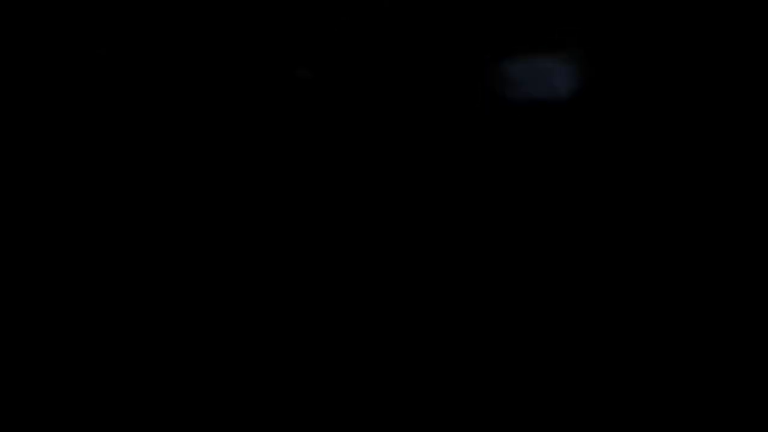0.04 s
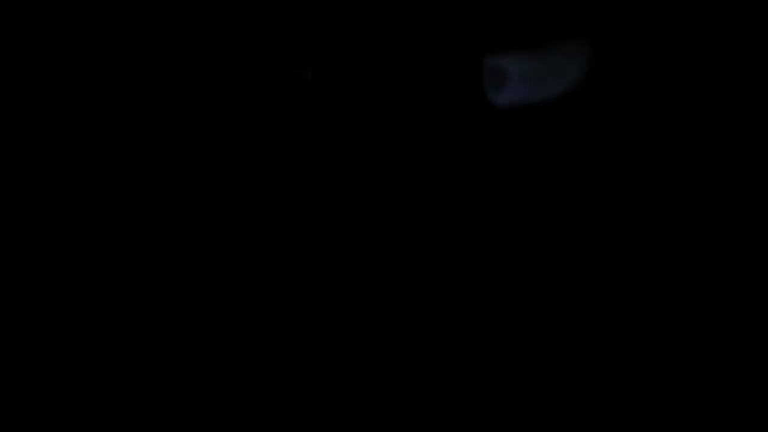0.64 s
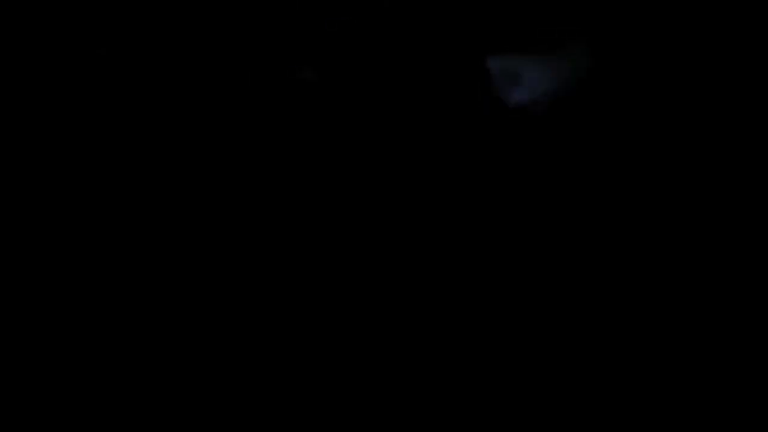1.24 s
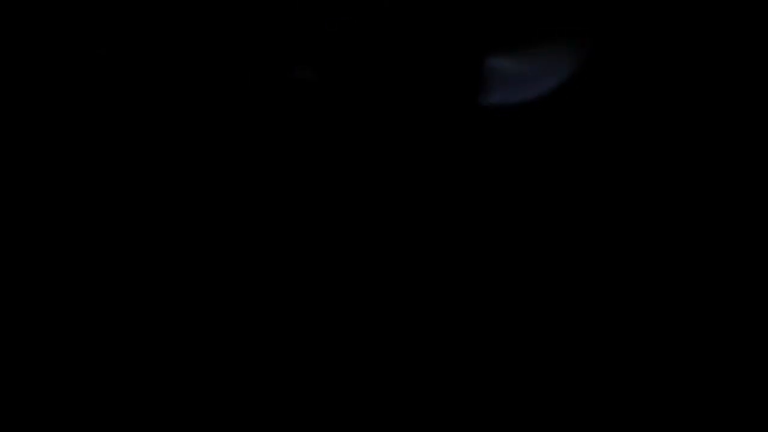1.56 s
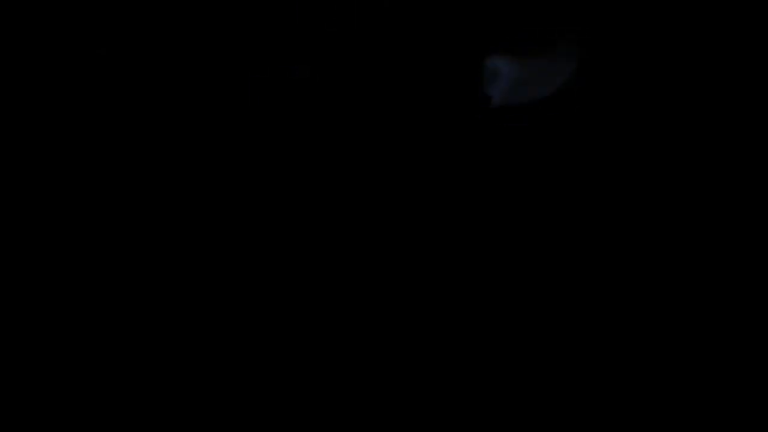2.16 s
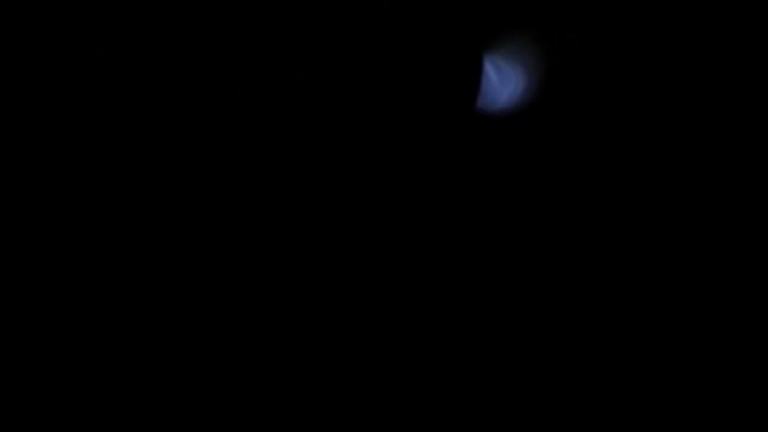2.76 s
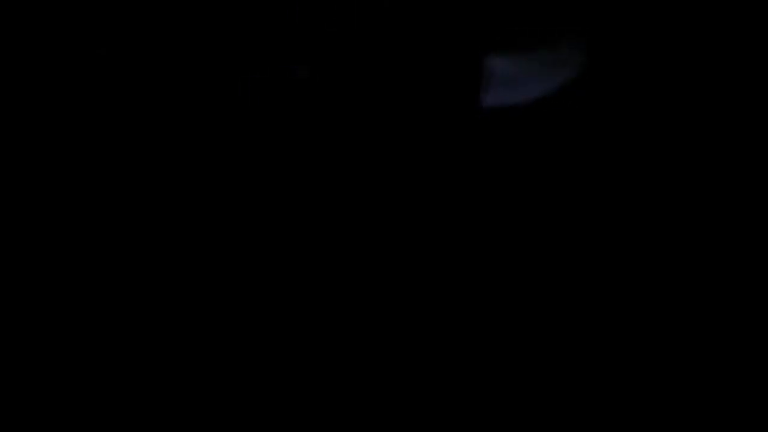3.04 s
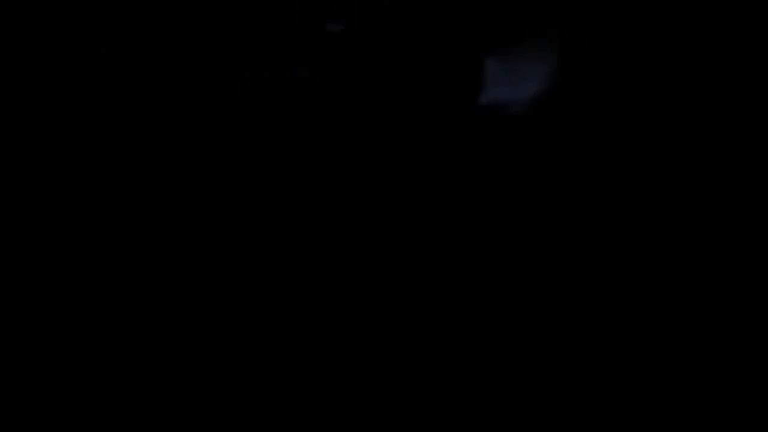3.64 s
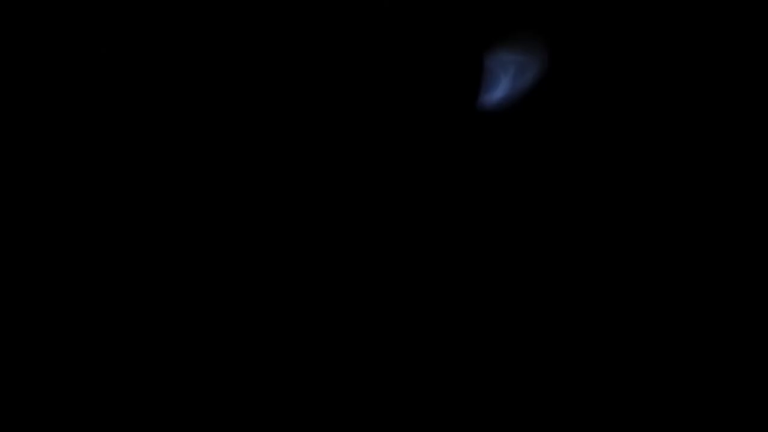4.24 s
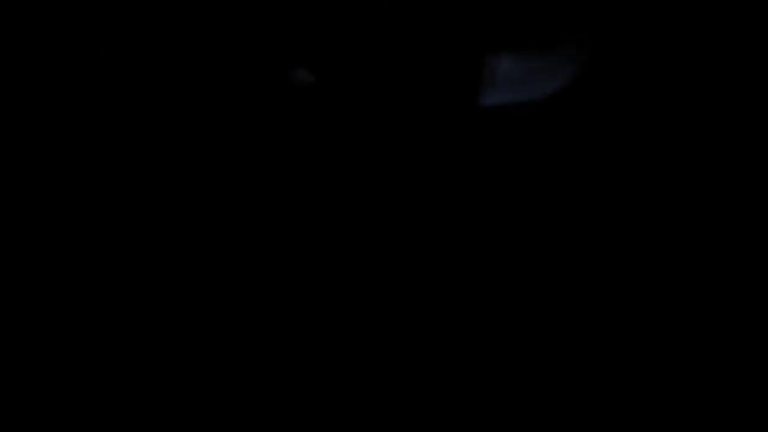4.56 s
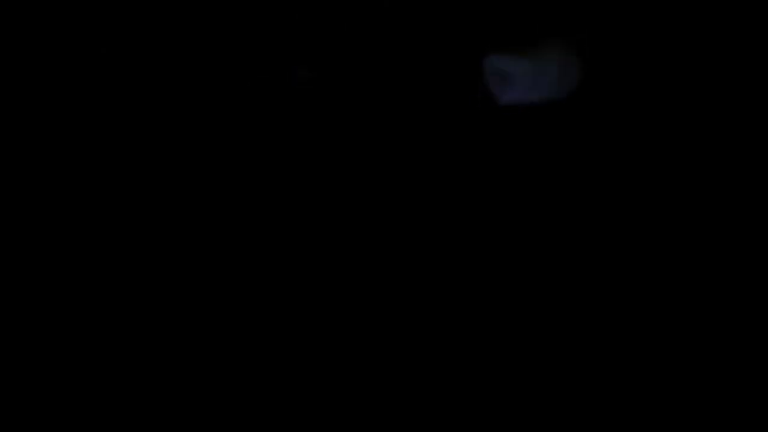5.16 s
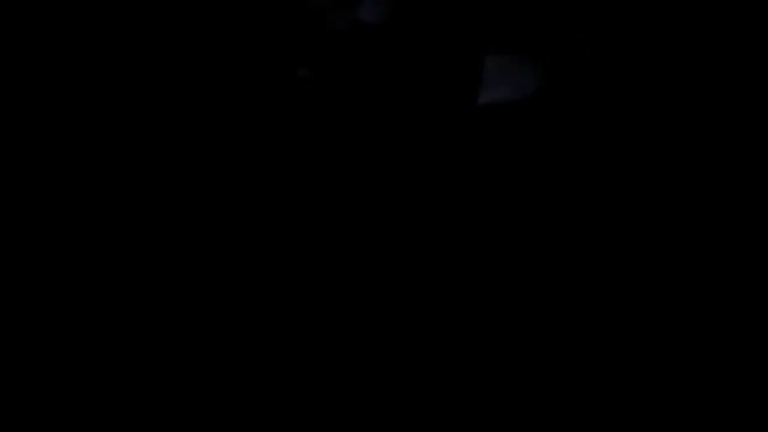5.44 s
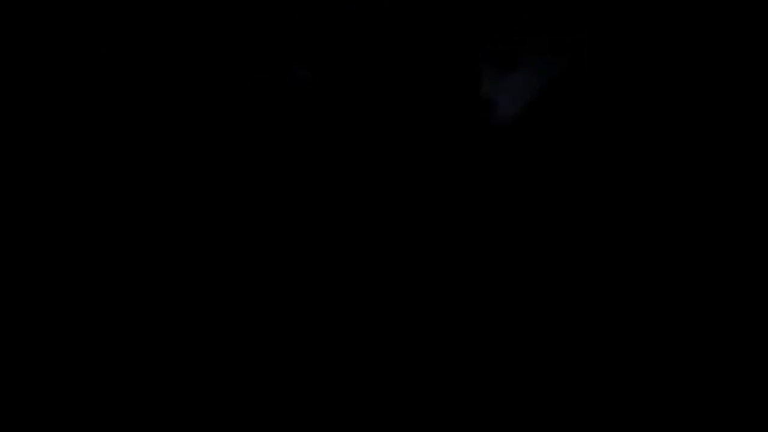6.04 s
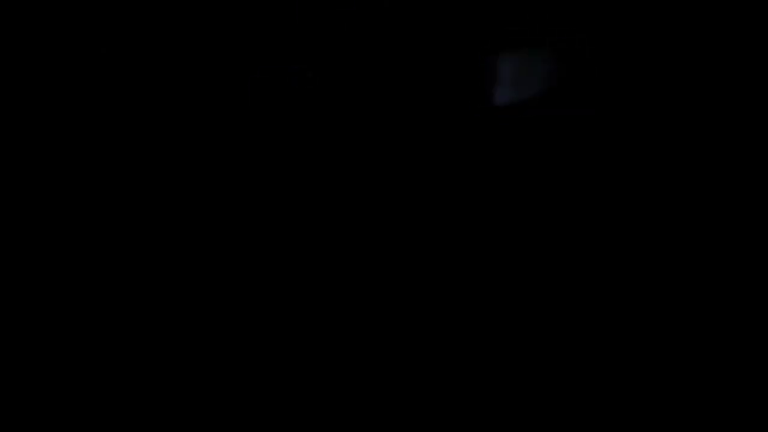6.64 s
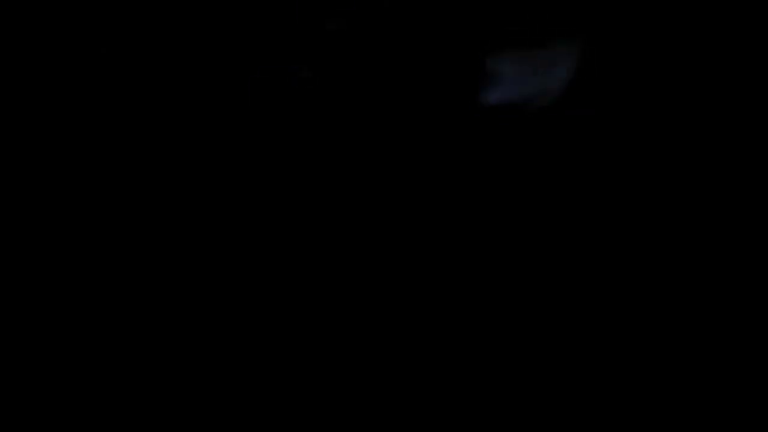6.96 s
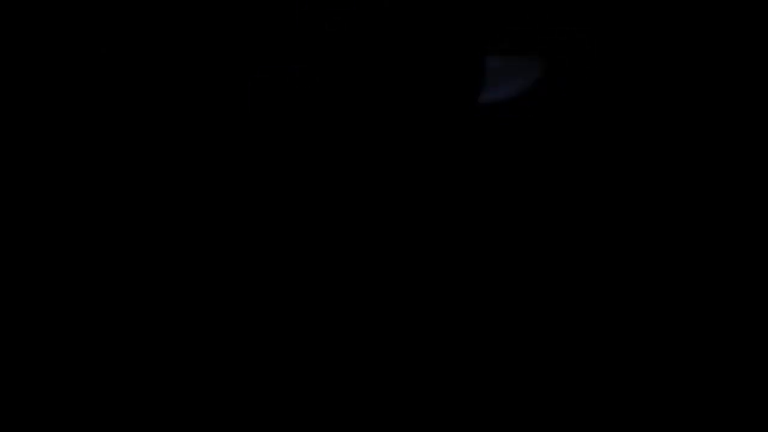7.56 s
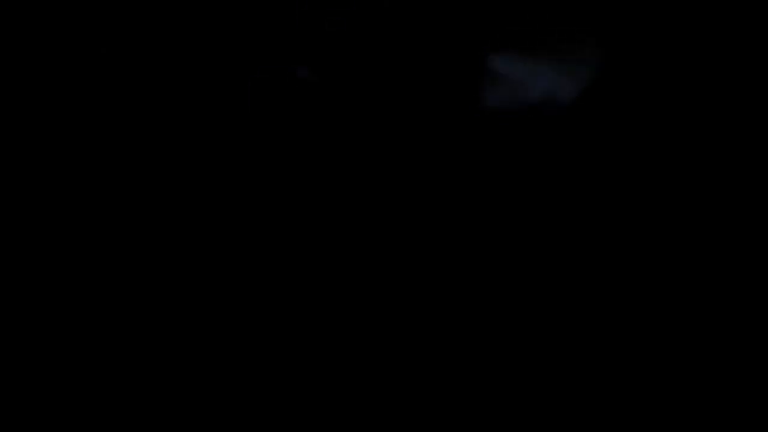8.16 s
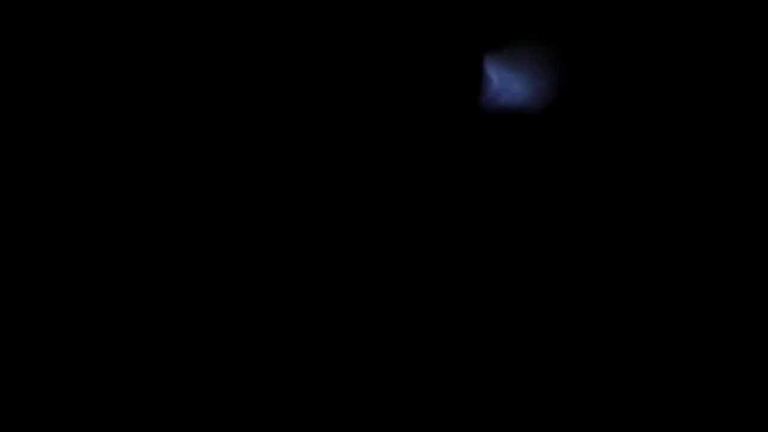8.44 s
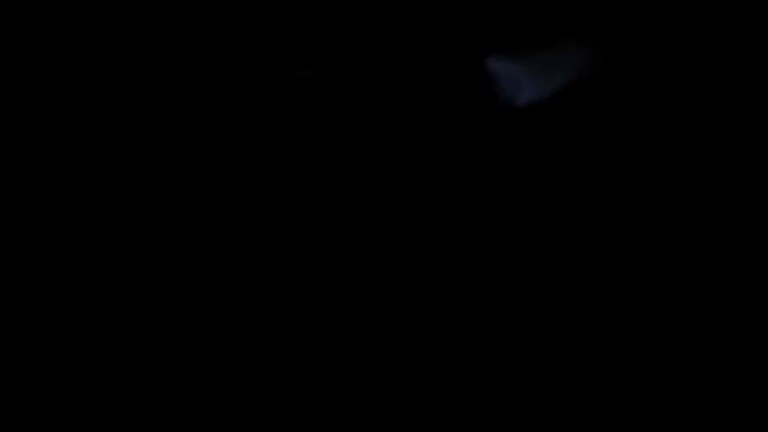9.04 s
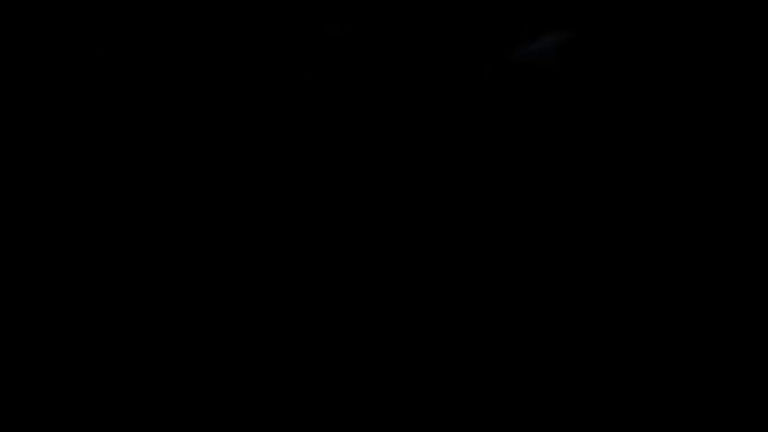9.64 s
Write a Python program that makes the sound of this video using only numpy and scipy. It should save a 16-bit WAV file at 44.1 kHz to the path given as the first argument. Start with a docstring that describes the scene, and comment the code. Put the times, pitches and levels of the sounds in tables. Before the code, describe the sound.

A blowlamp flame burns close by with a fast, rough flutter of soft puffs, topped by crackle and the hiss of the burner tube. At irregular moments the flame lifts off for an instant, leaving a thin jet hiss, then strikes back with a sharp pop and a brief rattle. The tube gives one hollow knock past the middle, and the flame blows off with a faint whoof at the end.

```python
"""A blowlamp flame burns close by, fluttering some forty times a second. Each swing burns a pocket of
gas with a soft puff; crackle rides on top and the burner tube hisses in between. Now and then the flame
lifts off, leaving the thin hiss of the bare jet over a low murmur, then strikes back with a sharp pop
and a brief rattle. The tube gives one hollow knock, and at the very end the flame blows off with a
faint whoof."""
import sys
import numpy as np
from scipy import signal
from scipy.fft import rfft, irfft, next_fast_len
from scipy.io import wavfile
from scipy.ndimage import uniform_filter1d, map_coordinates

SR = 44100
rng = np.random.default_rng(int(sys.argv[2]) if len(sys.argv) > 2 else 0)


def master_out(mix):
    """Clip the mix to full scale and print it as 16-bit PCM to the path in sys.argv[1]."""
    frames = np.transpose(np.atleast_2d(mix))
    ceiling = np.clip(frames, -1, 1)
    pcm = np.round(ceiling * 32767).astype(np.int16)
    wavfile.write(sys.argv[1], SR, pcm)


N = 437031
T = np.arange(N) / SR

FLUTTER_HZ = 43.58
LAST_SWING_S, LIFTED_S = .107, .095  # ahead of each pop: a last swing, then the lift-off
KNOCK_S, KNOCK_DB = 6.6425, -28
BLOW_OFF_S = 9.736
WHOOF_S, WHOOF_HZ, WHOOF_DB = 9.856, 263, -46.5

# Cue levels are pre-EQ.
# Accented puffs, some just ahead of a pop: time_s, level_db, width_ms
ACCENT_PUFFS = [(0.125, -22, 0.85), (0.164, -23, 1.2), (0.215, -21, 1.34), (0.388, -21, 1.04),
                (0.435, -21, 1.05), (0.556, -20.5, 1.17), (0.606, -19.5, 0.97), (0.841, -20.5, 1.14),
                (0.887, -23, 0.92), (0.963, -21, 0.89), (1.015, -22.5, 2.1), (1.1154, -21, 0.68),
                (1.121, -20, 0.86), (1.228, -33, 0.46), (1.3791, -23.5, 1.3), (1.525, -25.5, 1.1),
                (1.609, -22, 1.07), (1.894, -23.5, 2.3), (1.9237, -22, 0.66), (2.005, -21, 1.4),
                (2.1419, -21.5, 0.73), (2.348, -22, 1.3), (2.605, -23.5, 0.84), (2.668, -23, 1.65),
                (2.89, -28, 0.84), (3.236, -22, 0.86), (3.484, -20, 0.9), (3.584, -18.5, 1.13),
                (3.638, -24.5, 0.68), (3.727, -28, 1.52), (3.911, -29.5, 0.8), (4.069, -20.5, 1.75),
                (4.383, -23, 2.3), (4.616, -21, 1.1), (5.278, -22.5, 0.83), (5.326, -26.5, 0.81),
                (5.5145, -18, 0.77), (5.629, -21.5, 1.6), (6.017, -18, 1.5), (6.152, -20.5, 1.5),
                (6.202, -21, 1.01), (6.266, -18, 1.16), (6.353, -21.5, 1), (6.407, -19.5, 1.12),
                (6.427, -22, 0.93), (6.5045, -24, 1.16), (6.566, -23, 1.4), (6.6873, -26.5, 1.33),
                (6.752, -23, 1.06), (6.881, -20.5, 2), (6.913, -24, 2.3), (7.001, -20, 1.99),
                (7.093, -22, 1.29), (7.15, -22.5, 1.1), (7.246, -22, 1.5), (7.287, -24, 0.68),
                (7.329, -22, 1), (7.4596, -18.5, 1.39), (7.509, -19, 1), (7.631, -28, 1.4),
                (7.782, -29, 0.69), (7.871, -23, 1.2), (7.892, -19.5, 1.4), (8.064, -22.5, 1),
                (8.083, -24.5, 1.7), (8.5845, -37, 1.03), (8.968, -22, 1.04), (9.4407, -19, 1.1),
                (9.6629, -25, 0.7), (9.7127, -22.5, 0.92), (9.7339, -31, 0.68)]
# Slow level ride on the ordinary puffs: time_s, gain_db
FLUTTER_RIDE = [(0, -0.5), (1.4, -1.5), (3.1, 0.5), (5, -3), (6.3, -0.5), (7.4, -5), (8.4, -1.5), (9.5, -6)]
# The flame catches twice: start_s, level_db, gap_ms
DOUBLE_CATCHES = [(1.3131, -26, 2.7), (1.4763, -26, 2.7), (3.0246, -26.5, 2.5), (4.0116, -24.5, 1.56),
                  (4.5218, -25, 2.8), (4.9379, -23.5, 2.55), (5.8885, -26, 2.44), (7.0423, -27.5, 3.5),
                  (7.1381, -27.5, 2.81), (8.0407, -24.5, 3.8), (8.7916, -25, 2.4), (9.1679, -25, 2.17)]
# The returning flame puffs softly, then harder: before_pop_s, level_db, width_ms
LEAD_IN_PUFFS = [(0.05, -39, 4.2), (.013, -32, 2.4)]
# The flame strikes back: time_s, thump_db, thump_width_ms, ring_hz, ring_db, smack_hz, smack_db,
# crack_db, crack_delay_ms, ping_db, rattle_db, rattle_delay_ms
STRIKE_BACKS = [(1.1249, -14.5, 2.44, 520, -29.5, 2100, -31, -32.5, -1, -31, -27, 4.6),
                (1.9273, -9.5, 2.24, 636, -21, 950, -24, -30.5, -1, -26, -16.5, 13),
                (2.146, -14.5, 3.6, 480, -16, 1130, -20, -29, -1.5, -46, -18, 9.7),
                (2.352, -7, 1.76, 425, -32, 1002, -31, -31, -0.1, -46, -17, 16.6),
                (2.8966, -7, 1.9, 820, -40, 1570, -25, -31.5, 0.5, -22, -21, 16.7),
                (3.487, -10.5, 1.9, 546, -17, 1090, -26, -32, -1.9, -42, -13, 13),
                (4.3949, -12.5, 0.73, 460, -20, 2490, -37, -30.5, -1.5, -42, -17, 10.3),
                (5.5235, -19.5, 1.4, 740, -24, 1100, -33, -35, 1, -38, -24, 10.5),
                (5.787, -15.5, 1.42, 546, -22.5, 2400, -39, -29.5, -1.5, -36, -15, 10.5),
                (6.0211, -11.5, 3.04, 820, -20.5, 1130, -21, -28, -1, -30, -25, 12),
                (6.6933, -9.5, 1.94, 636, -31, 1060, -31.5, -29.5, -1, -30, -23, 10.6),
                (7.642, -11, 1.87, 691.7, -27, 1350, -27.5, -31.5, -1, -28, -32, 11.4),
                (8.59, -10, 1.62, 720, -37, 1190, -25, -29.5, -2.5, -31, -28, 10.6),
                (9.6745, -14.5, 1.8, 596, -21, 1550, -27.5, -33, 1, -42, -20, 13.7)]
# Sharp spits of the flame: start_s, level_db
FLAME_SPITS = [(0.0506, -23), (0.2842, -22), (0.6281, -21), (0.3053, -19.5), (0.902, -19.5), (1.4281, -20),
               (2.5099, -21), (2.7537, -22), (3.255, -24), (3.2968, -23), (3.315, -21.5), (3.5367, -21),
               (3.7346, -22.5), (3.95, -23.5), (4.136, -21.5), (4.1612, -21), (6.0667, -22), (6.331, -21),
               (6.523, -23), (7.0449, -19), (7.912, -18.5), (8.3, -22.5), (8.437, -23), (9.0159, -22.5),
               (9.0529, -23.5), (9.2778, -26), (9.5333, -19)]
# Modes of the tube's hollow knock: pitch_hz, level_db, t60_s
HOLLOW_MODES = [(357.5, 5, 0.041), (515, 0, 0.083), (753, 3, 0.054), (1120, -15, 0.041)]
# Resonances of the burner tube: centre_hz, width_hz, gain_db
TUBE_RESONANCES = [(980, 46, -5.5), (1214, 380, 3.5), (1395, 138, -9), (1555, 337, 5), (3160, 91, -8),
                   (3845, 550, 19.5), (5970, 200, -12.5), (6210, 130, 8.5), (7345, 710, 11),
                   (8200, 350, -2), (9150, 420, 4.5)]
# Reflections off the tube's mouth and the surroundings: delay_ms, gain (negative flips polarity)
REFLECTIONS = [(2.35, 0.097), (4.7, -0.091), (8.4, 0.063)]
# The body the lamp lends each puff and thump: frequency_hz, gain_db
BODY_EQ = [(15, -98), (30, -3), (46, 0.5), (64, 0.5), (90, 4.5), (200, 5), (340, 5.5), (415, 2.5),
           (500, 6.5), (700, 7), (1000, 0), (1400, -2), (3000, -8), (6000, 1)]
# Tone of the ignition crack: frequency_hz, gain_db
CRACK_EQ = [(200, -13), (900, 4.5), (1600, -4.5), (2300, -2.5), (3100, -11), (4000, -16.5), (5000, -22.5),
            (5900, -20), (7000, -20), (7900, -19.5), (9000, -49), (15000, -37)]
# Tone of the snaps in crackle and rattle: frequency_hz, gain_db
SNAP_EQ = [(200, 5.5), (900, 7.5), (1600, 2), (2300, 2.5), (3100, -7.5), (4400, -2.5), (5200, -4),
           (6000, -8), (7500, -19.5), (9000, -38), (11000, -27), (15000, -29)]
# Broad hiss of the burning flame: frequency_hz, gain_db
HISS_EQ = [(300, -1), (1000, 2), (1400, -5), (2000, -4.5), (3100, -4.5), (3500, -9.5), (4400, 1),
           (5200, -0.5), (5900, -6), (6700, -10.5), (8200, -7.5), (10800, -7.5), (12500, -16), (15000, -50)]
# The flame's fine top-end hiss: frequency_hz, gain_db
FINE_HISS_EQ = [(1000, -14), (8000, -3), (11000, -25), (12500, -15), (15000, -16)]
# Tone of the gas jet when cold: frequency_hz, gain_db
COLD_JET_EQ = [(1000, -30), (3000, -18), (3850, 5.5), (4300, 8), (4900, 4.5), (5700, -14), (6600, -8),
               (7300, 1.5), (8000, 1.5), (8800, 8.5), (9400, -1), (10300, -14), (12000, -12), (15000, -35)]
# Low bed of burning: frequency_hz, gain_db
MURMUR_EQ = [(18, -34), (30, -20), (45, -5), (110, 2.5), (300, -5.5), (700, -11.5), (1300, -26),
             (3000, -26.5), (7000, -48.5), (15000, -57)]


def roar(ordinary, strong, strong_db=-0.5, twin_db=-31, twin_ms=3.106, twin_width=0.64, pace_spread=0.72):
    """One puff a swing, each collapsing at its own pace; ordinary pockets often split off a weaker twin."""
    out = np.zeros(N)
    chance = rng.standard_normal((600, 4))
    paces = np.exp(pace_spread * np.abs(np.tanh(chance[:, 3])))
    for (s, db, width), pace in zip(strong, paces[::-1]):
        add(out, s, lambda t: undb(db + strong_db) * puff(t, width, pace))
    for (s, db, width), (split, side, lag, _), pace in zip(ordinary, chance, paces):
        twin_gain = undb(twin_db) * (1 + np.tanh(split))
        apart_ms = np.sign(side) * twin_ms * np.exp(0.452 * lag)
        add(out, s, lambda t: undb(db) * puff(t, width, pace))
        add(out, s, lambda t: twin_gain * puff(t - apart_ms, twin_width * width))
    return out


def puff(t, width, pace=1, sharpness=1.367, suck=0.125, suck_ms=2.1, suck_width_ms=5.1):
    """A gas pocket flares to a pointed peak, then sucks back: deeper and shorter at a higher pace."""
    flare = np.exp2(-np.abs(2 * t / width) ** sharpness)
    suction = suck * pace * width * bell(t - suck_ms, suck_width_ms / pace)
    return flare - suction


def flutter(jitter=.19):
    """The flame's rhythm: swing times that land on the cues, and which swings are ordinary."""
    accents = [row[0] for row in ACCENT_PUFFS + DOUBLE_CATCHES + STRIKE_BACKS]
    spits = [row[0] for row in FLAME_SPITS]
    last_swings = [row[0] - LAST_SWING_S for row in STRIKE_BACKS]
    cues = np.sort([0] + accents + spits + last_swings + [N / SR])
    chance = rng.standard_normal((len(cues), 128))
    times, ordinary = [], []
    for start, end, draw in zip(cues, cues[1:], chance):
        count = max(round((end - start) * FLUTTER_HZ), 1)
        periods = np.exp(jitter * draw[:count])
        times.extend(start + (end - start) * np.cumsum(periods) / periods.sum())
        ordinary.extend([True] * (count - 1) + [end not in accents])
    return np.array(times), np.array(ordinary)


def attachment(fade_s=0.012, last_fade_s=0.018, catch_s=0.0098):
    """The flame's gate: 1 while it sits on the burner, fading at lift-off, reopening fast with the pop."""
    dying = lambda s, fade: np.exp(-np.clip((T - s) / fade, 0, 20))
    held = dying(BLOW_OFF_S, last_fade_s)
    for s, *_ in STRIKE_BACKS:
        caught = np.clip((T - s) / catch_s + .5, 0, 1)
        held *= np.maximum(dying(s - LIFTED_S, fade_s), caught)
    return held


def pockets(swings, held, swing_db=-28, spread_db=-0.5, width_ms=1.9, width_spread=0.78):
    """Each swing of the seated flame burns a gas pocket of random size: time_s, level_db, width_ms."""
    size, stretch = np.tanh(rng.standard_normal((600, 2)))[:len(swings)].T
    db = swing_db + spread_db * size + np.interp(swings, *np.transpose(FLUTTER_RIDE))
    rows = np.column_stack([swings, db, width_ms * np.exp(width_spread * stretch)])
    return rows[np.interp(swings, T, held) > .9]


def sputters(width_ms=1.13):
    """A pocket catches twice in quick succession, which sounds hollow: time_s, level_db, width_ms."""
    return [(s + ms / 1000, db, width_ms) for s, db, gap_ms in DOUBLE_CATCHES for ms in (0, gap_ms)]


def returning_puffs(stray=0.108, spread_db=7.0):
    """The lifted flame puffs on its way back to the burner: time_s, level_db, width_ms."""
    chance = rng.standard_normal((len(STRIKE_BACKS), 2))
    return [(row[0] - lead_s * (1 + stray * early), db + spread_db * size, width)
            for row, (early, size) in zip(STRIKE_BACKS, chance)
            for lead_s, db, width in LEAD_IN_PUFFS]


def wrinkles(envelope, level_db=-38.5, range_db=12, width_ms=1.07, creep=7.5, creep_s=0.0077, count=3200):
    """Wrinkles in the flame front give a grain of tiny puffs, building as the lifted flame creeps back."""
    nearing = sum(np.exp(-np.abs(T - s) / creep_s) * (T < s) for s, *_ in STRIKE_BACKS)
    where, size = rng.random((count, 2)).T
    triggers = np.zeros(N)
    triggers[(where * N).astype(int)] = undb(level_db + range_db * (size - .5))
    grain = puff(np.arange(-800, 801) * 1000 / SR, width_ms)
    return signal.oaconvolve(triggers * (envelope + creep * nearing), grain, "same")


def lull(depth_db=-9, lead_ms=9.4, width_ms=11):
    """Gas gathers unburnt ahead of each accented puff or spit, ducking the flame's small sounds."""
    dip = np.zeros(N)
    for s, *_ in ACCENT_PUFFS + FLAME_SPITS:
        add(dip, s, lambda t: bell(t + lead_ms, width_ms))
    return undb(depth_db * dip)


def pops(draw_in=0.41, lead=0.9, steepness=0.6, rebound=0.14, rebound_ms=4.1, ring_ms=2.7):
    """Air is drawn in, the gathered gas goes off in a steep thump and rebounds; the flame front rings."""
    out = np.zeros(N)
    for s, db, width, ring_hz, ring_db, *_ in STRIKE_BACKS:
        add(out, s, lambda t: -undb(db) * draw_in * bell(t + lead * width, width_ms=1.0))
        add(out, s, lambda t: undb(db) * bell(t, width * (1 + steepness * np.sign(t))))
        add(out, s, lambda t: -undb(db) * rebound * bell(t - rebound_ms, width_ms=2.9))
        add(out, s, lambda t: undb(ring_db) * blip(t, ring_ms, ring_hz))
    return out


def smack(width_ms=1.0):
    """Each ignition gives the air in the tube a hard, very short slap with a pitch of its own."""
    out = np.zeros(N)
    for s, *_, hz, db, _, delay_ms, _, _, _ in STRIKE_BACKS:
        add(out, s, lambda t: undb(db) * blip(t - delay_ms, width_ms, hz))
    return out


def crack(burst_db=5.0, snap_db=13, burst_ms=2.7, ping_hz=3820, ping_ms=2.4, rush_db=-44, rush_ms=11):
    """The bright edge of each pop: a snap, a fast-dying crack and a nozzle ping, then a rush of gas."""
    decay = lambda t, ms: (t > 0) * np.exp(-np.abs(t) / ms)
    burst, clicks, ping = np.zeros((3, N))
    gas = rng.standard_normal(N)
    for s, *_, db, delay_ms, ping_db, _, _ in STRIKE_BACKS:
        ignites = s + delay_ms / 1000
        clicks[int(ignites * SR)] += undb(db + snap_db)
        add(burst, ignites, lambda t: undb(db + burst_db) * decay(t, burst_ms))
        add(ping, ignites, lambda t: undb(ping_db) * decay(t, ping_ms) * tone(t, ping_hz))
        add(burst, s, lambda t: undb(rush_db) * bell(t - rush_ms, width_ms=13))
    return ping + through_tube(gas * burst + clicks, CRACK_EQ) / np.std(through_tube(gas, CRACK_EQ))


def rattle(first_s=.003, span_s=0.012, weaker_db=-10, spread_db=3, puff_db=-11, puff_ms=0.58, count=6):
    """The flame grips the burner again: one hard snap and a small puff amid a ragged run of weaker snaps."""
    clicks, puffs = np.zeros((2, N))
    where = rng.random((len(STRIKE_BACKS), count))
    size = rng.standard_normal((len(STRIKE_BACKS), count))
    for (s, *_, db, delay_ms), places, sizes in zip(STRIKE_BACKS, where, size):
        grips = s + delay_ms / 1000
        clicks[int(grips * SR)] += undb(db)
        run_s = s + first_s + span_s * places
        clicks[(run_s * SR).astype(int)] += undb(db + weaker_db + spread_db * np.tanh(sizes))
        add(puffs, grips, lambda t: undb(db + puff_db) * puff(t, puff_ms))
    eq_gain = np.std(through_tube(rng.standard_normal(N), SNAP_EQ))
    return puffs + through_tube(clicks, SNAP_EQ) / eq_gain


def crackle(swings, held, ordinary, strong, strong_db=-3, ordinary_db=-14, sizzle_db=-20):
    """Sharp clicks in the tube: the flutter's ticks, spits with a sizzling tail, the kink of each puff."""
    clicks, sizzle = ticks(swings, held), np.zeros(N)
    for s, db in FLAME_SPITS:
        clicks[int(s * SR)] += undb(db)
        add(sizzle, s, lambda t: undb(db + sizzle_db) * (t > 0) * bell(t, width_ms=5))
    for puffs, snap_db in (strong, strong_db), (ordinary, ordinary_db):
        for s, db, width in puffs:
            clicks[int(s * SR)] += undb(db + snap_db) / width ** 2  # narrower puffs snap harder
    gas = rng.standard_normal(N)
    return through_tube(clicks + sizzle * gas, SNAP_EQ) / np.std(through_tube(gas, SNAP_EQ))


def ticks(swings, held, level_db=-36.5, range_db=19, uneven_db=4, scatter_s=.004, count=6):
    """Folds of the flame snap shut around each puff in faint ticks; some swings are crisper than others."""
    lag = rng.standard_normal((len(swings), count))
    size = rng.random((len(swings), count))
    swing_db = uneven_db * np.tanh(rng.standard_normal((len(swings), 1)))
    at = np.clip((swings[:, None] + scatter_s * lag) * SR, 0, N - 1).astype(int)
    gains = undb(level_db + swing_db + range_db * (size ** 2 - .5))
    return held * np.bincount(at.ravel(), gains.ravel(), N)


def knock(rise_s=0.0014):
    """A hollow knock: a few damped low modes of the tube, with a soft attack."""
    t = np.maximum(T - KNOCK_S, 0)
    ring = sum(undb(KNOCK_DB + db - 60 * np.minimum(t / t60, 2)) * np.sin(2 * np.pi * hz * t)
               for hz, db, t60 in HOLLOW_MODES)
    return ring * (1 - np.exp(-t / rise_s))


def whoof(width_ms=19):
    """A faint hollow swell from the blown-off flame."""
    out = np.zeros(N)
    add(out, WHOOF_S, lambda t: undb(WHOOF_DB) * blip(t, width_ms, WHOOF_HZ))
    return out


def hiss(phase, held, level_db=-55.5, throb_db=3, lag=0.55, flicker_db=7.5):
    """The flame's broad hiss swells between the puffs and flickers quickly."""
    swell_db = throb_db * (1 + 0.12 * walk(33)) * np.cos(2 * np.pi * (phase - lag))
    return held * tube_noise(HISS_EQ) * undb(level_db + swell_db + flicker_db * np.tanh(walk(260)))


def fine_hiss(held, level_db=-73):
    """An even, airy top layer from the burning flame."""
    return held * tube_noise(FINE_HISS_EQ) * undb(level_db)


def jet(phase, held, level_db=-64, hot_db=1.5, hot_rise=.2, swing_rise=0.0396, throb_db=4, cool_s=0.037):
    """The gas jet sings in two bands an octave apart that rise with the tube's heat and sag at lift-off."""
    heat = uniform_filter1d(held, int(cool_s * SR))
    vibrato = swing_rise * np.cos(2 * np.pi * (phase - .5))
    speed = 1 + heat * (hot_rise + vibrato + 0.016 * walk(60))
    cold = unit(colour(rng.standard_normal(N), COLD_JET_EQ, []))
    gas = map_coordinates(cold, [np.cumsum(speed) % (N - 1)], order=3)  # varispeed bends the pitch
    swell_db = held * throb_db * np.cos(2 * np.pi * (phase - 0.65))
    flicker_db = 4.9 * np.tanh(walk(80))
    return gas * undb(level_db + heat * hot_db + swell_db + flicker_db)


def murmur(level_db=-54.0, waver_db=5.5, linger_db=5, linger_s=.05):
    """A soft low bed of burning that carries on through lift-offs and lingers after the last blow-off."""
    swell_db = linger_db * bell(1000 * (T - BLOW_OFF_S - linger_s / 2), 1000 * linger_s)
    return tube_noise(MURMUR_EQ) * undb(level_db + waver_db * walk(35) + swell_db)


def tube_noise(eq):
    """Steady gas noise shaped by the tube, rms 1."""
    return unit(through_tube(rng.standard_normal(N), eq))


def through_tube(x, eq=((1, 0), (SR / 2, 0))):
    """Ring the burner tube with x, through an EQ curve that is flat by default."""
    return colour(x, eq, TUBE_RESONANCES)


def colour(x, eq, resonances, order=8192):
    """Minimum-phase EQ: a smooth curve with resonances on top."""
    f = np.arange(order // 2 + 1) * SR / order
    hz, db = np.transpose(eq)
    curve_db = np.interp(np.log(f + 1), np.log(hz), db)
    peaks_db = sum(gain / (1 + (2 * (f - centre) / width) ** 2) for centre, width, gain in resonances)
    cepstrum = irfft(np.log(undb(curve_db + peaks_db)))
    cepstrum[1:order // 2] *= 2  # folded forward, so nothing rings ahead of a hit
    cepstrum[order // 2 + 1:] = 0
    return signal.oaconvolve(x, irfft(np.exp(rfft(cepstrum))))[:N]


def zero_phase_eq(x, eq):
    """Set the tonal balance without delaying the bass, so pulses stay tight."""
    size = next_fast_len(N + SR)
    hz, db = np.transpose(eq)
    f = np.arange(size // 2 + 1) * SR / size
    gain = undb(np.interp(np.log(f + 1), np.log(hz), db))
    return irfft(rfft(x, size) * gain, size)[:N]


def add(track, s, shape):
    """Mix in shape(t), t in ms from the moment s, over 40 ms on either side."""
    i = np.arange(max(int((s - .04) * SR), 0), min(int((s + .04) * SR), N))
    track[i] += shape((i / SR - s) * 1000)


def bell(t, width_ms):
    """A rounded bump of height 1, width_ms wide at half height."""
    return np.exp2(-(2 * t / width_ms) ** 2)


def tone(t, hz):
    """A cosine, t in ms."""
    return np.cos(2 * np.pi * hz * t / 1000)


def blip(t, width_ms, hz):
    """A tone under a bell envelope."""
    return bell(t, width_ms) * tone(t, hz)


def walk(rate_hz):
    """Random sample-and-hold, slewed twice; rms 1."""
    hold = int(SR / rate_hz)
    steps = np.repeat(rng.standard_normal(N // hold + 1), hold)
    return unit(uniform_filter1d(uniform_filter1d(steps, hold), hold)[:N])


def undb(db):
    """Decibels to gain."""
    return 10 ** (np.asarray(db) / 20)


def unit(x):
    """Scale to rms 1."""
    return x / np.sqrt(np.mean(x ** 2))


def scene(bunch_db=3.0):
    """Mono mix: combustion pulses and their echoes, one-shots and crackle over hiss, jet and murmur."""
    held = attachment()
    burning = held * lull()
    swings, is_ordinary = flutter()
    phase = np.interp(T, swings, np.arange(len(swings)))  # in swings; whole numbers at the puffs
    ordinary = pockets(swings[is_ordinary], held)
    strong = ACCENT_PUFFS + sputters() + returning_puffs()
    wrinkling = held * burning * undb(bunch_db * np.cos(2 * np.pi * phase))  # strongest around each puff
    pulses = zero_phase_eq(roar(ordinary, strong) + wrinkles(wrinkling) + pops(), BODY_EQ)
    pressure = through_tube(pulses + smack())
    echoes = sum(gain * np.interp(T - ms / 1000, T, pressure) for ms, gain in REFLECTIONS)
    bed = hiss(phase, burning) + fine_hiss(held) + jet(phase, held) + murmur()
    one_shots = knock() + whoof() + crack() + rattle()
    crackling = crackle(swings[:-1], burning, ordinary, strong)
    return (pressure + echoes + one_shots + crackling + bed)[None]


def record(dry, top_hz=15400):
    """A steep low-pass trims the very top."""
    return signal.sosfilt(signal.ellip(8, .2, 70, top_hz, fs=SR, output="sos"), dry)


dry = scene()
out = record(dry)
master_out(out)
```